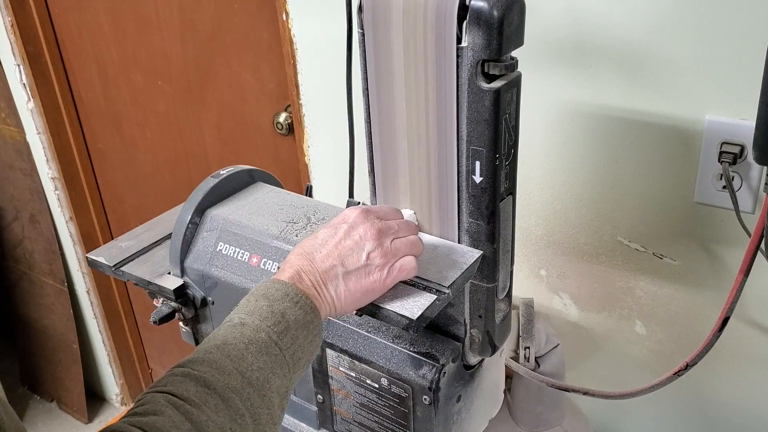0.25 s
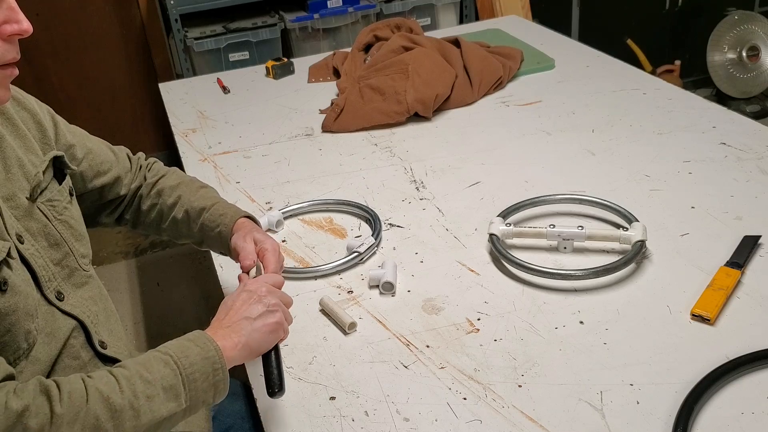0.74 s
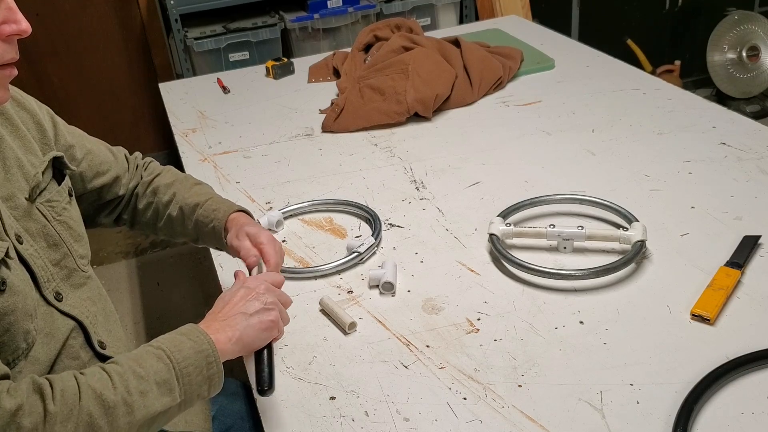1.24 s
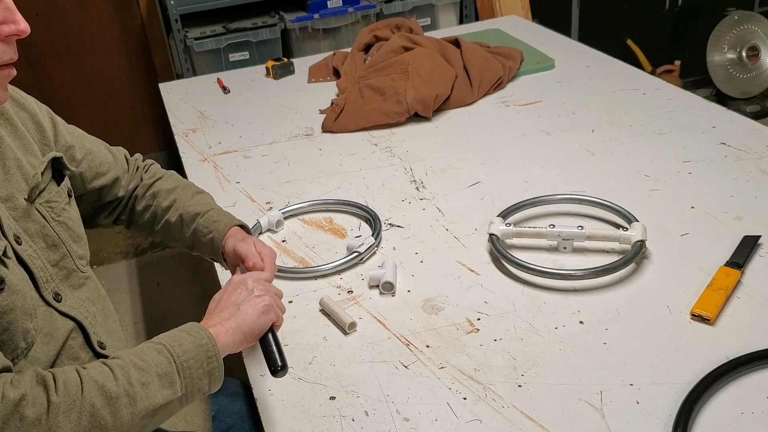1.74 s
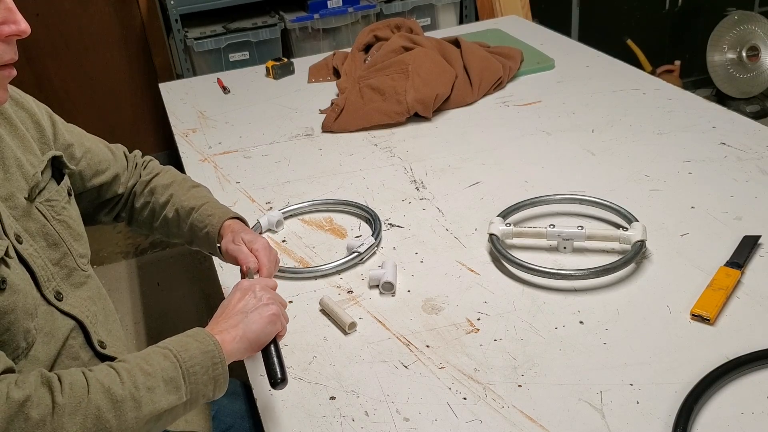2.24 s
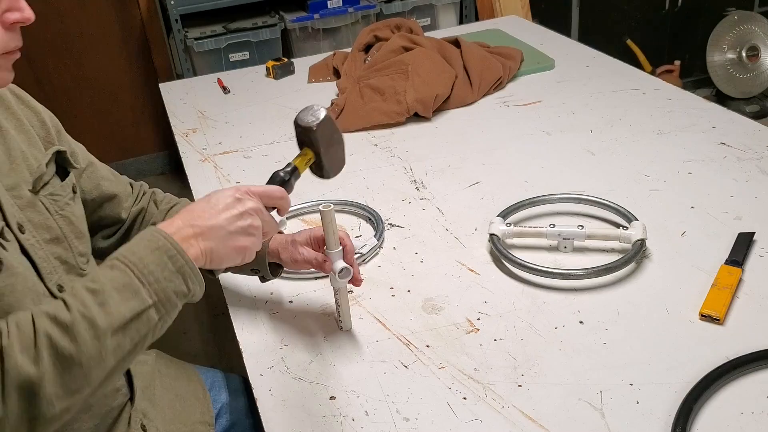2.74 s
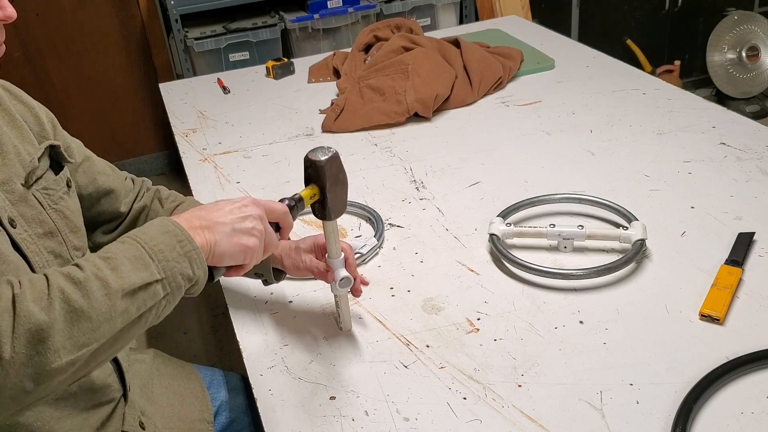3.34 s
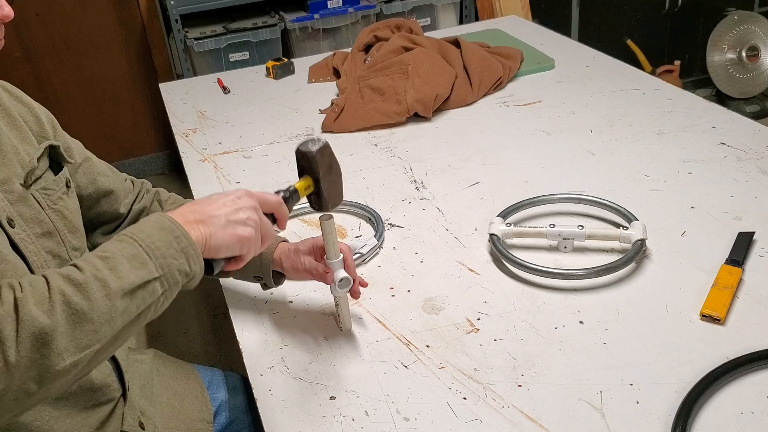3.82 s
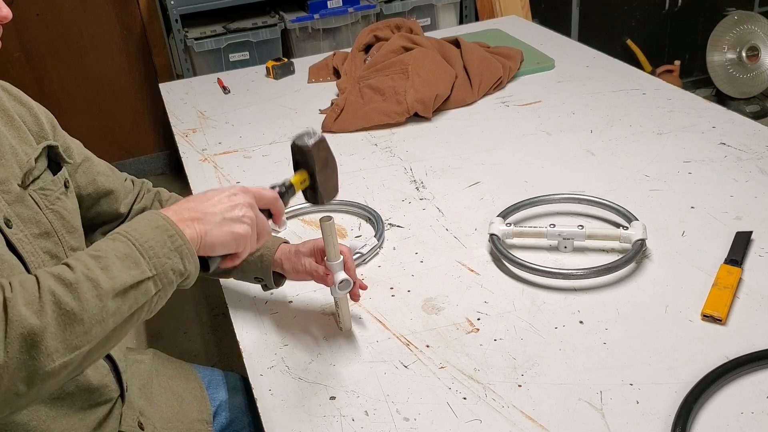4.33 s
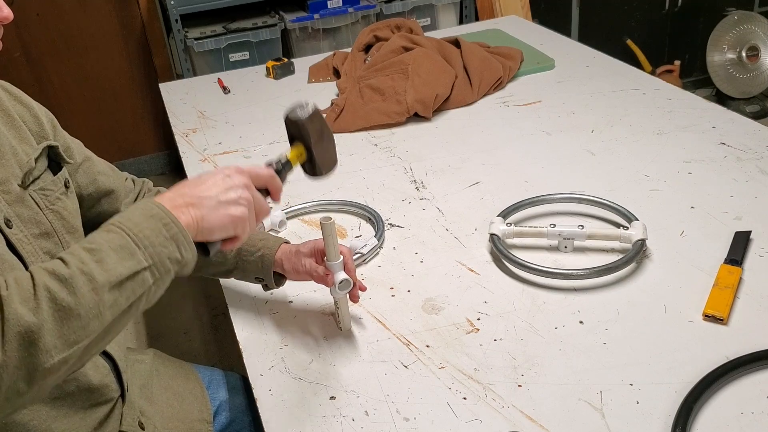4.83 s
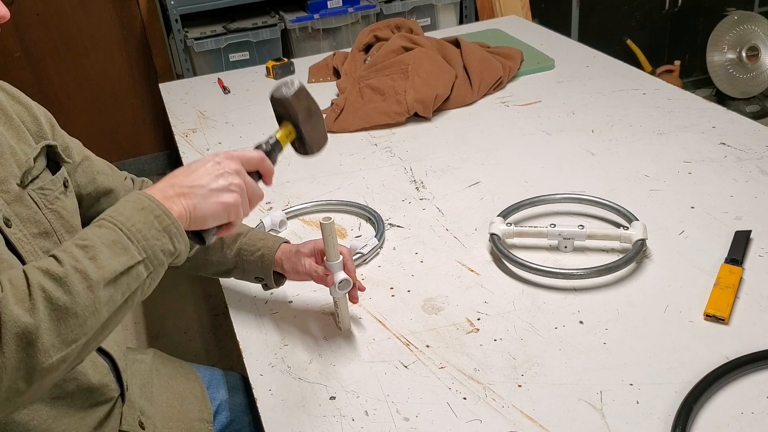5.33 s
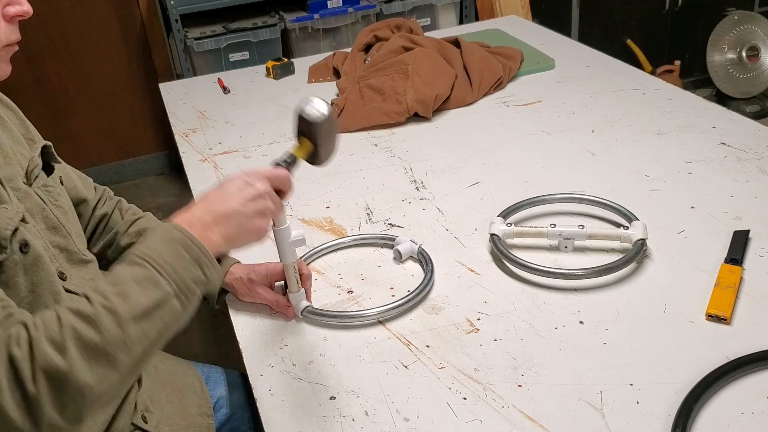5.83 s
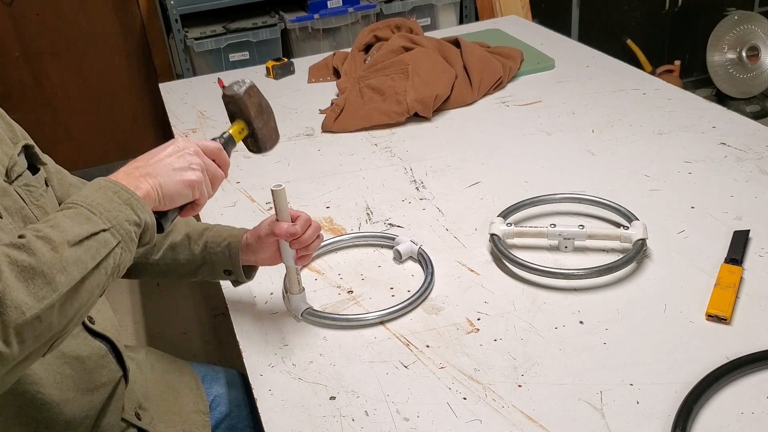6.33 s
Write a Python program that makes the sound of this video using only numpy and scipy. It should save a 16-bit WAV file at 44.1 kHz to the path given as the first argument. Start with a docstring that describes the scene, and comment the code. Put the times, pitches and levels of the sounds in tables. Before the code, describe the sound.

A gritty sander burst with motor whine breaks off into near quiet, with tiny dry clicks and scrapes of plastic being trimmed. Seven evenly spaced hammer blows follow, growing from a hollow tap to near-overloaded thuds that shake the bench and make metal hoops jingle. A short slide, soft bumps and a tick precede a weaker final knock. Nearby microphone, small hard room, short echoes, low background rumble.

```python
"""Pipe fitting in a small workshop

A belt sander grinds plastic pipe as flickering noise with motor tones, then breaks off. A hand tool scrapes and
nicks a pipe end in runs of tiny contacts and dry snaps. A small sledge drives the pipe into its fitting, with blows
that soon grow harder: the bench booms, loose parts chatter, steel hoops jump and clink. The work is slid round,
set down and struck once more. Noise tails give a small live room, and low rumble and faint hiss stay underneath."""
import sys
import numpy as np
from scipy import signal
from scipy.fft import rfft, irfft, next_fast_len
from scipy.io import wavfile
from scipy.ndimage import map_coordinates

SR = 44100
rng = np.random.default_rng(int(sys.argv[2]) if len(sys.argv) > 2 else 0)


def generate_wav(sig):
    """Save sig (samples, or channels by samples) to the path in sys.argv[1] as 16-bit PCM at SR."""
    pcm = np.round(np.clip(np.atleast_2d(sig).T, -1, 1) * 32767).astype(np.int16)
    wavfile.write(sys.argv[1], SR, pcm)


N = 289737
TIME = np.arange(N) / SR  # whole scene, seconds
TAIL = np.arange(SR) / SR  # one second, for things that ring

# low rumble of the workshop air: (frequency [Hz], relative level [dB])
RUMBLE_SPECTRUM = [(13, -55.5), (22, -21), (64, 2), (81, 1), (97, -2.5), (140, -4.5), (233, -16.5),
                   (300, -12), (390, -44), (660, -120)]
# faint hiss of the workshop air: (frequency [Hz], relative level [dB])
DRAFT_SPECTRUM = [(120, -60.5), (200, -31), (268, -19), (416, -9), (500, -14), (548, -11.5), (836, -19.5),
                  (933, -11), (1140, -29), (1270, -22), (2610, -31.5), (3970, -27), (5130, -42.5),
                  (9230, -37), (16000, -36.5)]
RUMBLE_DB, DRAFT_DB = -62, -63.5
# stereo width of noise: (frequency [Hz], side minus mid [dB])
STEREO_WIDTH = [(60, -17), (130, -17), (250, -13), (500, -5.5), (1000, -.5), (2000, -.5), (4000, 1.5),
                (8000, 1.5), (15000, 0)]
# how long the room rings: (frequency [Hz], time to fall 60 dB [s])
ROOM_DECAY = [(80, 0.35), (250, 0.44), (700, 0.31), (2000, 0.28), (5000, 0.32), (10000, 0.27),
              (16000, 0.26)]
TOP_HZ = 15850  # upper band limit
TRIM_PAN_DB, AIR_PAN_DB = 2, 2.5  # left minus right

# sanding noise: (frequency [Hz], relative level [dB])
GRIT_SPECTRUM = [(26, -52), (45, -16), (197, -24), (258, -12), (401, -12), (539, -13), (672, -7),
                 (925, -13), (1150, -7.5), (1440, -15), (2350, -11.5), (3660, -21), (4140, -18),
                 (10000, -21), (16000, -15)]
# resonances of the sander's frame: (frequency [Hz], width [Hz], lift [dB])
FRAME_PEAKS = [(710, 130, 7), (2300, 1700, 1.5), (3360, 410, 3.5), (4200, 340, 8.5), (6645, 230, 4),
               (9900, 800, -2.5), (11050, 950, 2.5), (12400, 820, -4)]
# motor and roller tones: (frequency [Hz], relative level [dB])
WHINE_TONES = [(142, -42.5), (199, -39), (398, -36), (667.5, -29), (763, -40), (841, -39.5), (1125, -31),
               (1583, -38), (1733, -41.5)]
# stereo lean of the sander: (frequency [Hz], left minus right [dB])
SANDER_LEAN = [(60, 0), (110, -1), (200, -1), (380, -1), (700, 0.5), (1290, -3), (2380, 2.5), (4400, 4.5),
               (8120, 0.5), (15000, -2.5)]
GRIND_DB = -15  # overall level of the grit noise
SANDER_END, HAMMER_END = 0.3541, 5.842  # where the sound breaks off, s

# scraping strokes: (time [s], length [s], level [dB])
SCRAPE_STROKES = [(.4, 0.11, -59), (.84, 0.06, -49), (1.06, 0.068, -63), (1.48, 0.17, -56.5),
                  (2.31, 0.036, -57.5), (2.435, 0.06, -48.5), (2.486, 0.014, -40.5)]
# colour of scraped plastic: (frequency [Hz], relative level [dB])
PLASTIC_SPECTRUM = [(350, -39), (600, -14), (1210, -14.5), (1850, -13), (2990, -8), (3430, -8),
                    (3730, -1.5), (5260, -14), (6830, -10.5), (9620, -15), (10200, -21), (11500, -14.5),
                    (16000, -20)]
# blade catching in the plastic: (time [s], level [dB], brightness [dB per octave], resonance [Hz])
BLADE_NICKS = [(.3843, -53.5, -6, 1600), (.7525, -62, -2.5, 1320), (.8425, -47.5, -0.5, 1310),
               (.8904, -52, 3, 6850), (1.2489, -53, 3, 4300), (1.4618, -49, -1.5, 1270),
               (1.5321, -55, -8, 1340), (1.561, -51, -1.5, 1300), (1.604, -49, -2.5, 3940),
               (2.0532, -47, -7, 3560), (2.3186, -57.5, 2.5, 1390), (2.3464, -59, 7, 3000),
               (2.4284, -42, -0.5, 3760), (2.479, -46, -5, 2970), (2.4917, -39.5, 2, 3220)]
# colour of a snap: (frequency [Hz], relative level [dB])
NICK_SPECTRUM = [(300, -21), (750, -2.5), (1340, 3.5), (3000, 4), (8900, -9), (16000, -13)]
# resonances of the hand-held pipe: (frequency [Hz], width [Hz], lift [dB])
PIPE_PEAKS = [(1200, 160, 4), (1780, 1300, -9.5), (3130, 67, 2), (4100, 700, 8), (5340, 1700, -8.5),
              (7050, 930, 9)]
# each snap favours one resonance, by where the blade bites
NICK_WIDTH_HZ, NICK_LIFT_DB = 910, 9.5
TEAR_T60_S, TEAR_DB = 0.022, -0.5  # fall time and level of the tearing noise

# the work sliding on the bench: (time [s], length [s], level [dB])
SLIDE_STROKES = [(6.04, 0.082, -45), (6.11, 0.16, -41)]
# colour of the slide: (frequency [Hz], relative level [dB])
SLIDE_SPECTRUM = [(880, -35), (1500, -13), (2300, -17), (2970, -29), (3120, -14), (4120, -1), (8920, -13),
                  (10900, -9.5), (16000, -12)]
# the work bumping on the bench: (time [s], level [dB], resonance [Hz])
BENCH_BUMPS = [(6.0316, -31.5, 715), (6.057, -37.5, 253), (6.1703, -32.5, 320), (6.235, -28.5, 860),
               (6.284, -40, 330)]
# colour of a bump: (frequency [Hz], relative level [dB])
BUMP_SPECTRUM = [(22, -18.5), (50, 1.5), (95, 6.5), (212, 13), (1340, 6.5), (3000, -5.5), (8900, -26),
                 (16000, -32)]
# the pipe ticks when set down: (time [s], level [dB], brightness [dB per octave], resonance [Hz])
SET_DOWN_TICK = (6.2128, -37.5, 0, 2400)

# hoops falling back: (time [s], relative level [dB], brightness [dB per octave])
HOOP_CLINKS = [(5.2277, -17.5, 0.5), (5.2586, -20, 7.5), (5.307, -16, -0.5), (5.345, -20.5, -6.5),
               (5.6473, -20, -1.5), (5.7016, -18.5, -4.5)]
# modes of a steel hoop: (frequency [Hz], relative level [dB], time to fall 60 dB [s])
HOOP_MODES = [(958, -18, .21), (2099, -11, .26), (2315, -13, .22), (3346, -2, .24), (3623, -14, .25),
              (4715, 0, .26), (5197, -5, .28), (5550, -14, .25), (6276, -4, .26), (7111, -16, .3),
              (7993, -6, .26), (9480, -12, .2), (10779, -2, .2), (11980, -5, .22), (12400, -11, .18),
              (13770, -10, .18), (14270, -7, .2), (14480, -9, .14), (15357, 1, .14)]
# noise of hoops clashing: (frequency [Hz], relative level [dB])
CLASH_SPECTRUM = [(900, -8.5), (1500, -15), (3250, 0.5), (5300, -1.5), (7500, -1), (8800, -13.5),
                  (10500, -3.5), (12500, -5), (16000, -15)]
# colour of the loose parts: (frequency [Hz], relative level [dB])
LOOSE_SPECTRUM = [(180, -30.5), (300, -5), (447, -8.5), (749, -6), (1250, -10.5), (2070, -5.5), (2980, -14),
                  (4020, -8.5), (5610, -25), (6300, -13), (7440, -25.5), (11100, -24.5), (16000, -25.5)]
# resonances of the chattering hoops: (frequency [Hz], width [Hz], lift [dB])
RATTLE_PEAKS = [(3280, 140, 9), (5000, 13, 7), (5430, 180, 8.5), (6140, 110, 2.5), (7600, 90, -0.5),
                (7960, 150, 12), (11260, 860, 7.5), (11700, 140, 1.5), (14270, 200, 0.5)]

# hammer blows: (time [s], level [dB], share that reaches the bench [dB], pipe resonance [Hz],
# extra thud [dB], brightness [dB per octave], click against room [dB], hoop ring [dB])
HAMMER_BLOWS = [(2.9772, -12.5, -17, 1346, -5, -2, -4, -75.5), (3.3608, -2, -9, 1370, -8, 3, -4.5, -61),
                (3.7854, -1.5, -2.5, 2200, -17, 0, -16.5, -43),
                (4.2266, -2.5, -1, 2390, -9.5, 0.9, -11.5, -42),
                (4.6881, 0, -.8, 1750, -2, 0, -11.5, -25.5), (5.1478, 1.5, 0, 1560, 0, -2, -9, -28.5),
                (5.5703, 0, -0.67, 1700, 0, 0, -10, -32.5), (6.556, -13.5, -8.5, 823, 3.5, -2.5, -6, -69)]
# colour of a full blow on the pipe: (frequency [Hz], relative level [dB])
KNOCK_SPECTRUM = [(22, -25.5), (50, -16.5), (95, 0.5), (212, 2), (1340, -8), (3000, -8), (8900, -30),
                  (16000, -37.5)]
# resonances of bench and pipe: (frequency [Hz], width [Hz], lift [dB])
BODY_PEAKS = [(114, 21, 7.5), (177.4, 35, 9.5), (260.6, 29, -4), (379, 75, 4.5), (486, 38, -2.5),
              (557, 47, 0), (780, 200, -1), (1610, 100, 3.5), (1810, 70, 2.5), (2350, 86, 4.5),
              (3400, 150, 1), (5800, 750, -11.5), (6280, 250, 12.5), (7130, 180, 1), (10000, 1000, -7.5),
              (11160, 900, 7.5)]
# long ring of the bench top: (frequency [Hz], relative level [dB], time to fall 60 dB [s])
BOOM_MODES = [(65.3, -9, 0.86), (77.95, -15, 0.85), (122, -14, .6), (185.3, -10.5, 0.56), (221, -24, 0.96),
              (311, -27.5, 0.39)]
# long ring of the steel hoops: (frequency [Hz], relative level [dB], time to fall 60 dB [s])
SING_MODES = [(2116, -11.5, 1.3), (2288, -22, 1.2)]
# As the pipe seats, more of a blow reaches the bench. Each law: (value when seated [dB], gain per dB of share [dB])
# lift of the hollow note; a loose pipe knocks more hollow
HOLLOW_BY_SHARE = (4.4, -0.73)
# level of the bench boom
BOOM_BY_SHARE = (-15, 0.76)
# level of the chatter
CHATTER_BY_SHARE = (-18, 1.31)
CHATTER_LAG_S, CHATTER_S = .004, .09  # delay after a blow; length when the full blow reaches the bench
THUD_HZ, CLACK_HZ = 209, 1310  # extra thud fades out between these; brightness acts above the second
HOLLOW_WIDTH = 0.45  # width of the hollow note over its pitch
OVERTONE_RATIO, OVERTONE_SHARE = 3, 0.2  # second bending mode: pitch and lift against the first
BOOM_RISE_S = .006  # soft start of the boom, so that it begins without a click


def amp(db):
    """Turn decibels into gain."""
    return 10 ** (np.asarray(db) / 20)


def rms(x):
    """Average strength of a signal (root mean square)."""
    return np.sqrt(np.mean(x ** 2) + 1e-20)


def along(points, hz):
    """Read a curve of (Hz, value) points on a log frequency axis."""
    f, v = np.transpose(points)
    return np.interp(np.log(hz + 1), np.log(f), v)


def lifts(peaks, hz):
    """Gain in dB of a set of resonances, each a smooth hump or dip."""
    return sum(db / (1 + (2 * (hz - centre) / width) ** 2) for centre, width, db in peaks)


def tilt(hz, bright, pivot_hz):
    """Gain in dB that changes by bright per octave above a pivot."""
    return bright * np.log2(np.maximum(hz, pivot_hz) / pivot_hz)


def by_share(law, share_db):
    """Level in dB when this share of a blow reaches the bench."""
    seated_db, slope = law
    return seated_db + slope * share_db


def wobble(rate, size=N):
    """A smooth random curve through rate random points a second."""
    points = rng.standard_normal(int(size * rate / SR) + 4)
    return map_coordinates(points, [np.arange(size) * rate / SR])


def colour(x, level):
    """Filter to the gain level(Hz) in dB, with no sound before its cause."""
    size = x.shape[-1]
    m = 2 * next_fast_len(size // 2 + 4096)
    gain = np.maximum(amp(level(np.fft.rfftfreq(m, 1 / SR))), 1e-6)
    # folding the cepstrum forward in time gives the minimum-phase filter
    cepstrum = irfft(np.log(gain))
    cepstrum[1:m // 2] *= 2
    cepstrum[m // 2 + 1:] = 0
    response = np.exp(rfft(cepstrum))
    return irfft(rfft(x, m) * response, m)[..., :size]


def diffuse(size):
    """White stereo noise, alike in the bass and less related in the treble."""
    mid, side = rfft(rng.standard_normal((2, size)))
    spread = amp(along(STEREO_WIDTH, np.fft.rfftfreq(size, 1 / SR)))
    ports = np.array([mid + spread * side, mid - spread * side])
    return irfft(ports / np.sqrt(1 + spread ** 2), size)


def room(direct_db):
    """A click and a fresh noise tail that dies at each pitch's own pace, like echoes in a workshop."""
    hz, t, z = signal.stft(diffuse(SR), SR, nperseg=256)
    fall_db = -60 * t / along(ROOM_DECAY, hz)[:, None]
    tail = signal.istft(z * amp(fall_db), SR)[1][:, :SR]
    tail /= np.linalg.norm(tail[0])  # left tail gets energy 1
    tail[:, 0] += amp(direct_db)
    return tail


def struck(x):
    """Scale a hit so that its first 30 ms have rms 1."""
    return x / rms(x[..., :SR * 3 // 100])


def ring(modes, waver):
    """Dying tones of a struck body, with random strengths and slightly drifting phases."""
    total = np.zeros(SR)
    for (hz, db, t60), chance in zip(modes, rng.normal(0, 2, len(modes))):
        phase = 2 * np.pi * hz * TAIL + waver * wobble(40, size=SR)
        total += amp(db + chance - 60 * TAIL / t60) * np.sin(phase)
    return total


def add(out, s, x):
    """Mix x into out from time s on."""
    start = round(s * SR)
    out[:, start:start + x.shape[-1]] += x[..., :N - start]


def until(s, fade):
    """Gain that closes around time s."""
    return np.clip((s - TIME) / fade + .5, 0, 1)


def panned(x, left_db):
    """Lean a stereo sound to the left."""
    return x * amp(np.array([[left_db], [-left_db]]) / 2)


def leaned(x, left_db):
    """Raise the left and lower the right by left_db(Hz)."""
    return np.array([colour(port, lambda f: sign * left_db(f)) for port, sign in zip(x, (1, -1))])


def rasp(strokes, spectrum, peaks, rate, swell_db, direct_db):
    """Runs of tiny random contacts, rate a second, that change by swell_db over each run."""
    out = np.zeros((2, N))
    for s, length, db in strokes:
        size = round(length * SR)
        contacts = (rng.random(SR) < rate / SR)[:size]
        grains = contacts * rng.standard_normal(SR)[:size] * amp(swell_db * np.arange(size) / size)
        echoed = signal.fftconvolve(room(direct_db), grains[None], axes=1)
        sound = colour(echoed, lambda f: along(spectrum, f) + lifts(peaks, f))
        add(out, s, sound * amp(db) / rms(sound[:, size // 2:size]))
    return out


def knock(spectrum, hollow_hz, lift_db, direct_db, edge_db):
    """One contact shakes pipe and bench, stressing the pipe's hollow note and its overtone."""
    width = HOLLOW_WIDTH * hollow_hz
    hollow = (hollow_hz, width, lift_db)
    overtone = (OVERTONE_RATIO * hollow_hz, width, OVERTONE_SHARE * lift_db)
    peaks = list(BODY_PEAKS) + [hollow, overtone]
    response = room(direct_db)
    # one sharp edge adds treble
    response[:, :3] += amp(edge_db) * np.array([1, -2, 1]) / 2
    return colour(-struck(response), lambda f: spectrum(f) + lifts(peaks, f))


def air():
    """Workshop air: noise filtered into a low rumble and a faint steady hiss."""
    rumble = colour(diffuse(N), lambda f: along(RUMBLE_SPECTRUM, f))
    peaks = [(410, 180, 3.6), (4030, 600, 13)]
    hiss = colour(diffuse(N), lambda f: along(DRAFT_SPECTRUM, f) + lifts(peaks, f))
    return amp(RUMBLE_DB) * rumble / rms(rumble) + amp(DRAFT_DB) * hiss / rms(hiss)


def sander():
    """Grit tears at the plastic and shakes the frame; motor and rollers whine."""
    size = SR // 2
    flicker_db = 0.99 * wobble(400, size=size) + 0.62 * wobble(35, size=size)
    grit = diffuse(size) * amp(flicker_db)
    grit = colour(grit, lambda f: along(GRIT_SPECTRUM, f) + lifts(FRAME_PEAKS, f))
    grit *= amp(GRIND_DB) / rms(grit)
    tones = np.zeros(size)
    for hz, db in WHINE_TONES:
        slip = .3 * wobble(20, size=size)  # changing load makes every tone waver a little
        phase = 2 * np.pi * (hz * TIME[:size] + rng.random()) + slip
        tones += amp(db + 2.5) * np.sin(phase)
    out = np.zeros((2, N))
    add(out, 0, leaned(grit + tones, lambda f: along(SANDER_LEAN, f) / 2))
    return out * until(SANDER_END, fade=0.027)


def snaps(events):
    """Short dry snaps in the pipe wall: a burst of tearing noise excites its resonances."""
    out = np.zeros((2, N))
    for s, db, bright, hz in events:
        tear = rng.standard_normal(SR) * amp(-60 * TAIL / TEAR_T60_S)
        snap = struck(room(direct_db=-20) + amp(TEAR_DB) * tear / np.linalg.norm(tear))
        slope = lambda f: bright * np.log2(np.clip(f, 1340, 8900) / 3000)
        peaks = list(PIPE_PEAKS) + [(hz, NICK_WIDTH_HZ, NICK_LIFT_DB)]
        add(out, s, amp(db) * colour(snap, lambda f: along(NICK_SPECTRUM, f) + slope(f) + lifts(peaks, f)))
    return out


def trimming():
    """A blade scrapes the pipe end in many tiny contacts and snaps where it catches."""
    scraping = rasp(SCRAPE_STROKES, PLASTIC_SPECTRUM, [], rate=1100, swell_db=4, direct_db=-3)
    return panned(snaps(BLADE_NICKS) + scraping, TRIM_PAN_DB)


def bumps():
    """The work is set down and rocks on the bench, each contact a soft knock."""
    out = np.zeros((2, N))
    for s, db, hollow_hz in BENCH_BUMPS:
        bump = knock(lambda f: along(BUMP_SPECTRUM, f), hollow_hz, lift_db=6.5, direct_db=-2.5, edge_db=-13)
        add(out, s, amp(db) * bump)
    return out


def turning():
    """The work slides on the bench with a fading hiss, bumps and ticks."""
    sliding = rasp(SLIDE_STROKES, SLIDE_SPECTRUM, [], rate=3600, swell_db=-3.5, direct_db=-26)
    return bumps() + snaps([SET_DOWN_TICK]) + sliding


def clinks():
    """The hoops, thrown up by the hardest blows, land with a clash and ring."""
    out = np.zeros((2, N))
    # the clash noise gathers in a broad hump round each hoop mode
    humps = [(hz, 150, 19) for hz, _, _ in HOOP_MODES]
    for s, db, bright in HOOP_CLINKS:
        modes = struck(np.array([ring(HOOP_MODES, waver=0.69) for port in range(2)]))
        clash = colour(room(direct_db=-9.5), lambda f: along(CLASH_SPECTRUM, f) + lifts(humps, f))
        clink = colour(modes + amp(1.5) * struck(clash), lambda f: tilt(f, bright, pivot_hz=3000))
        add(out, s, amp(db - 4.0) * struck(clink))
    # the highest modes radiate toward the right
    return leaned(out, lambda f: along([(9000, -0.5), (14000, -3.5)], f))


def chatter(blows):
    """Loose parts rattle after each blow, longer and louder the more the bench is shaken."""
    shaken = []
    for s, _, share_db, *_ in blows:
        length = CHATTER_S * amp(share_db)
        shaken.append((s + CHATTER_LAG_S, length, by_share(CHATTER_BY_SHARE, share_db)))
    return rasp(shaken, LOOSE_SPECTRUM, RATTLE_PEAKS, rate=1500, swell_db=7.0, direct_db=-14.5)


def blow(db, share_db, hollow_hz, thud_db, bright, click_db, sing_db):
    """The hammer knocks the pipe and leaves bench top and hoops ringing."""
    thud = [(THUD_HZ, thud_db), (CLACK_HZ, 0)]
    spectrum = lambda f: along(KNOCK_SPECTRUM, f) + along(thud, f) + tilt(f, bright, CLACK_HZ)
    lift_db = by_share(HOLLOW_BY_SHARE, share_db)
    hit = knock(spectrum, hollow_hz, lift_db, direct_db=click_db, edge_db=click_db + 2.0)
    boom = ring(BOOM_MODES, waver=0.91) * (1 - np.exp(-TAIL / BOOM_RISE_S))
    boom *= amp(by_share(BOOM_BY_SHARE, share_db))
    return amp(db) * hit + boom + amp(sing_db) * ring(SING_MODES, waver=.15)


def hammer(blows):
    """A run of blows, each a knock with its rings, and the chatter they shake loose."""
    out = chatter(blows)
    for s, *stroke in blows:
        add(out, s, blow(*stroke))
    return out


def scene():
    """Sanding, trimming, hammering, turning the work, one more blow, all over workshop air."""
    background = panned(air(), AIR_PAN_DB)
    driving = (hammer(HAMMER_BLOWS[:-1]) + clinks()) * until(HAMMER_END, fade=0.025)
    last_blow = hammer(HAMMER_BLOWS[-1:])
    return background + sander() + trimming() + turning() + driving + last_blow


def record(dry):
    """Round off peaks near full scale, then filter away what lies above the band limit."""
    soft = dry / (1 + np.abs(dry) ** 6) ** (1 / 6)
    low_pass = signal.firwin(401, TOP_HZ, window="blackman", fs=SR)
    return signal.fftconvolve(soft, low_pass[None], "same", axes=1)


dry = scene()
out = record(dry)
generate_wav(out)
```